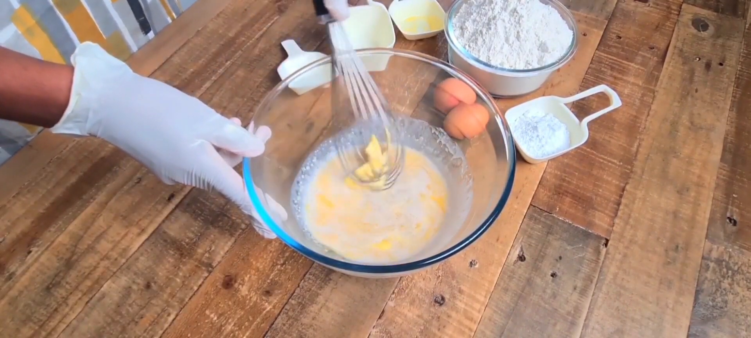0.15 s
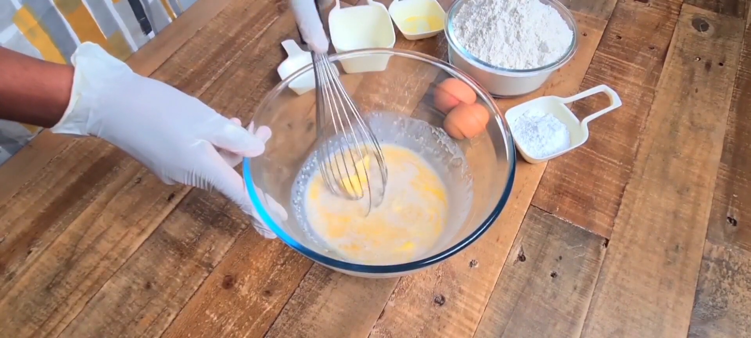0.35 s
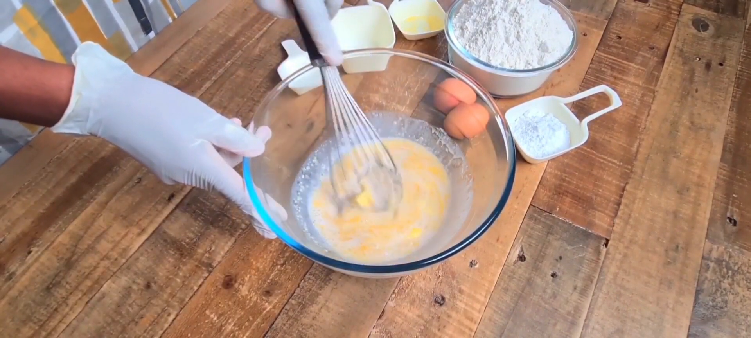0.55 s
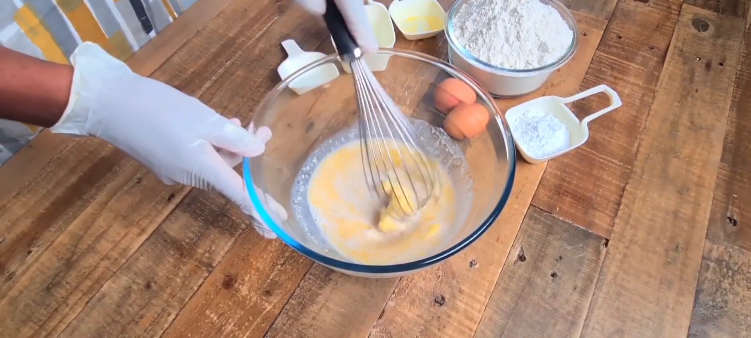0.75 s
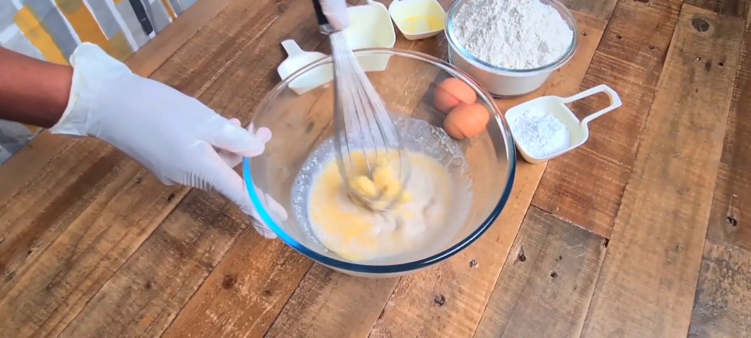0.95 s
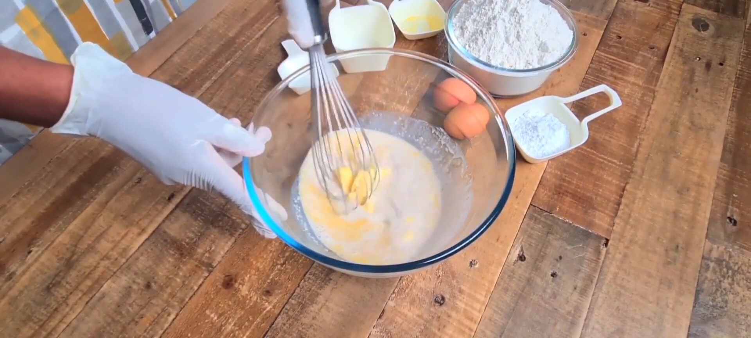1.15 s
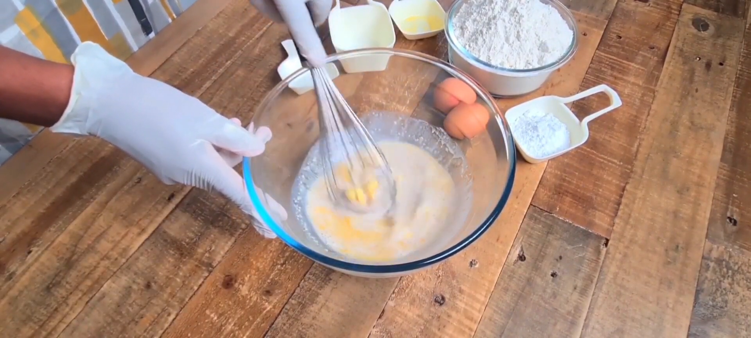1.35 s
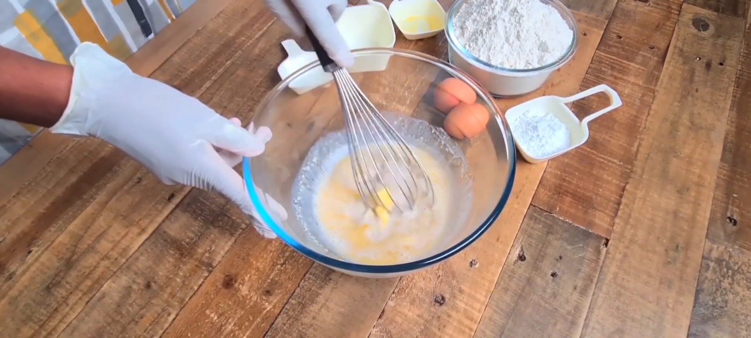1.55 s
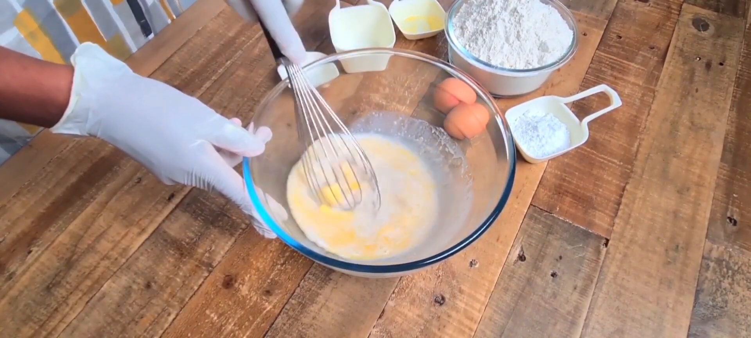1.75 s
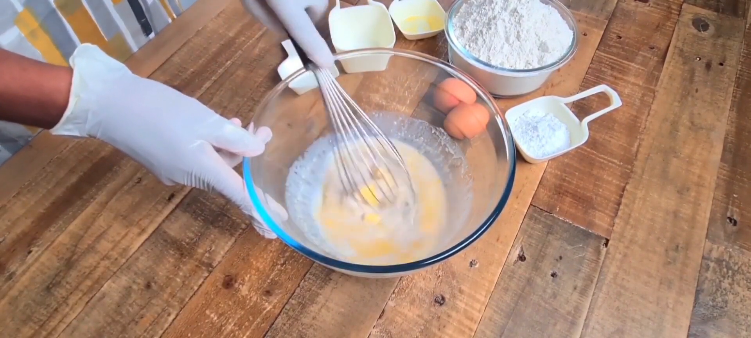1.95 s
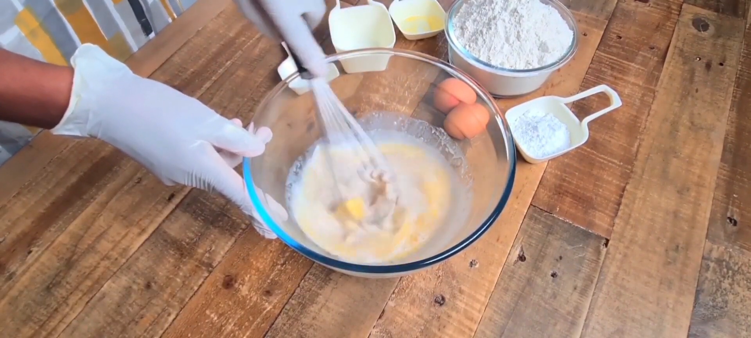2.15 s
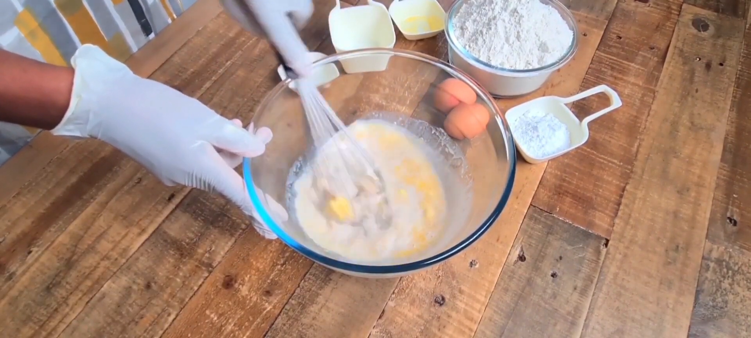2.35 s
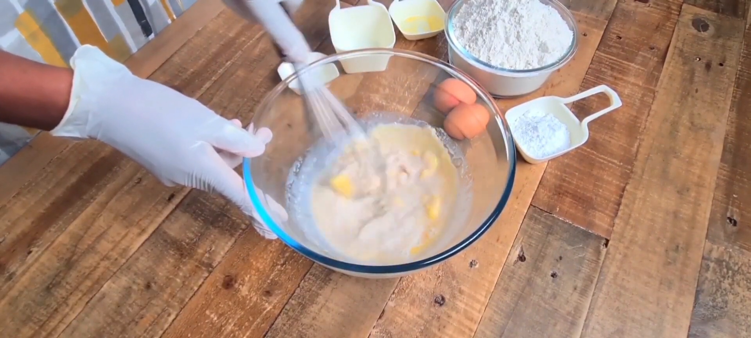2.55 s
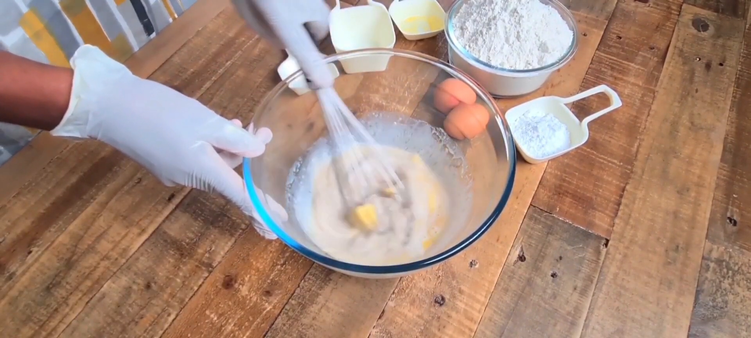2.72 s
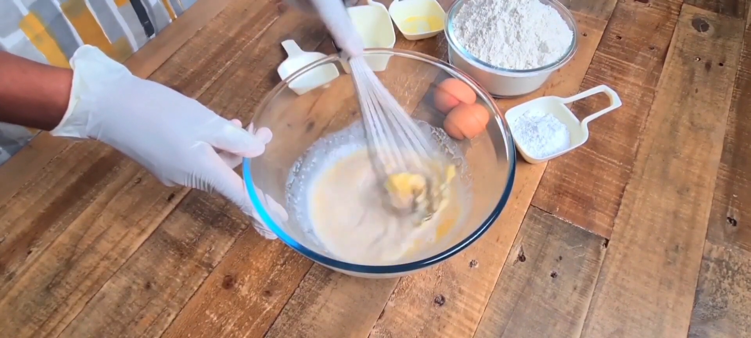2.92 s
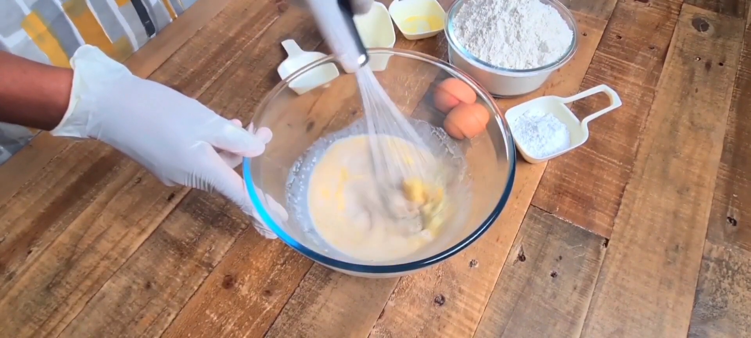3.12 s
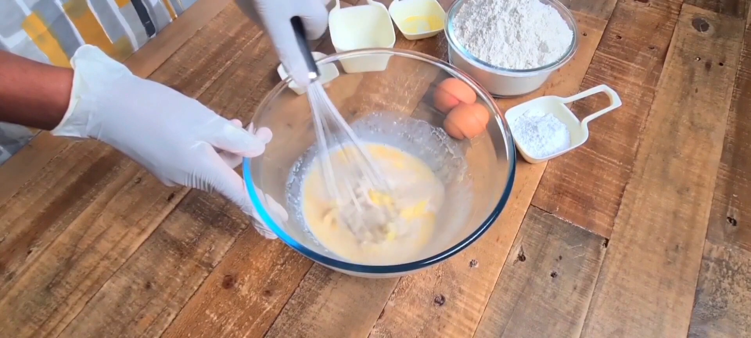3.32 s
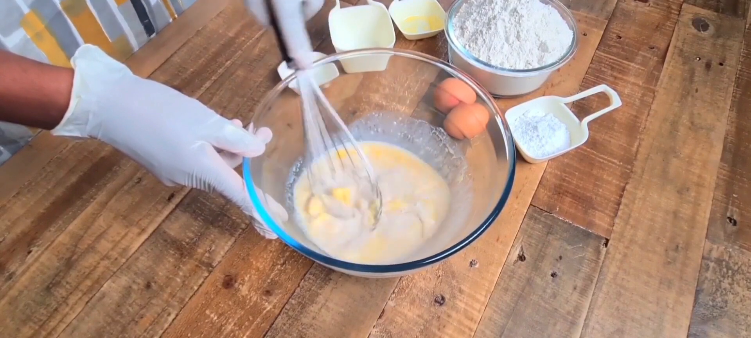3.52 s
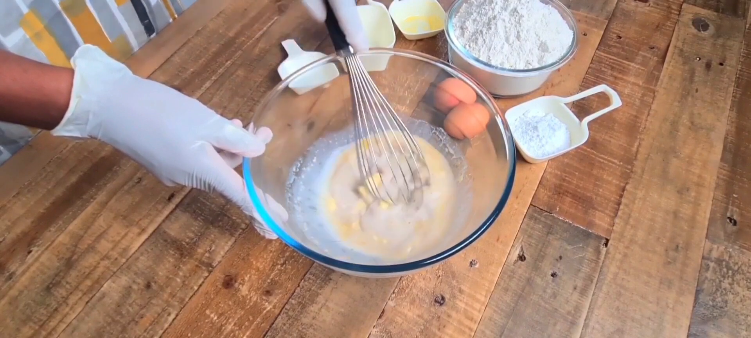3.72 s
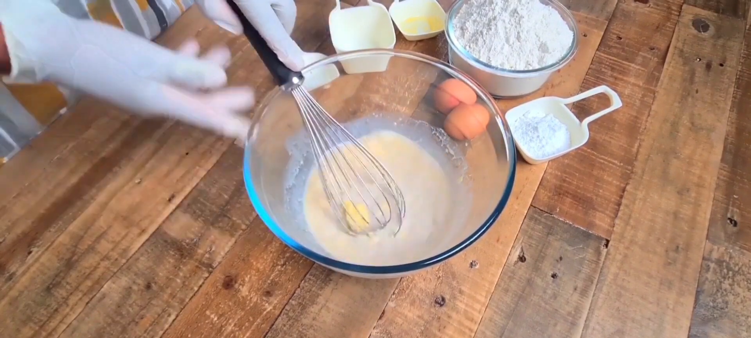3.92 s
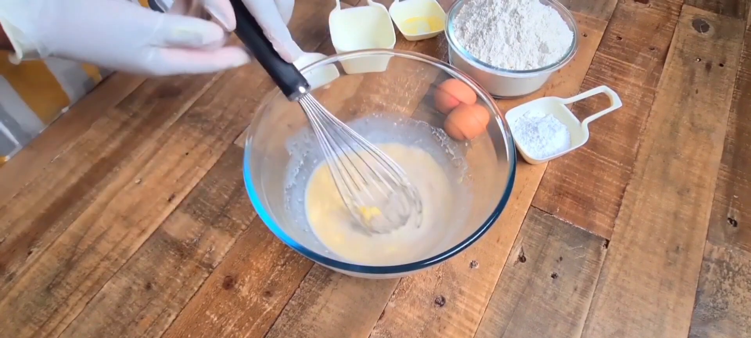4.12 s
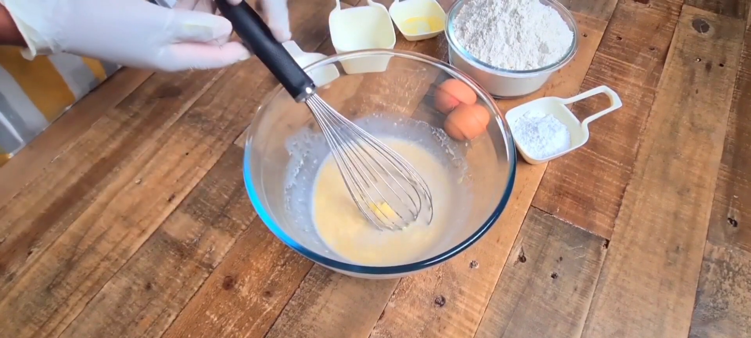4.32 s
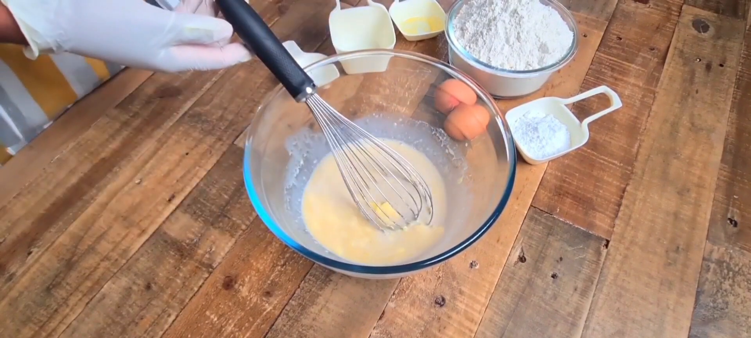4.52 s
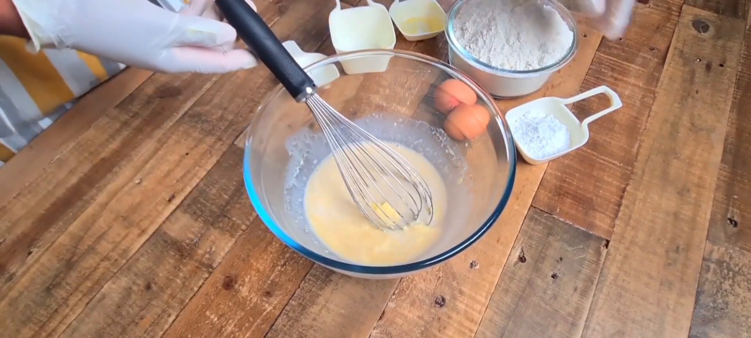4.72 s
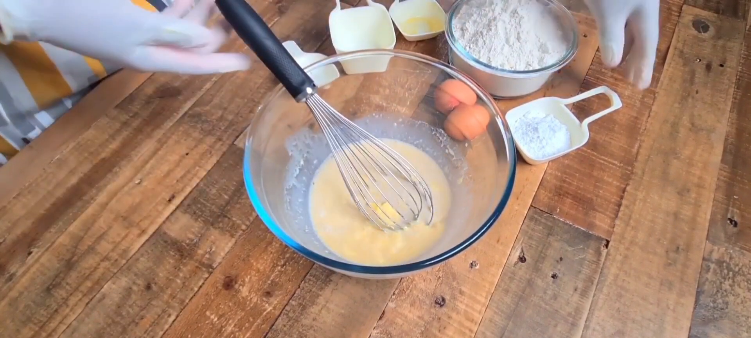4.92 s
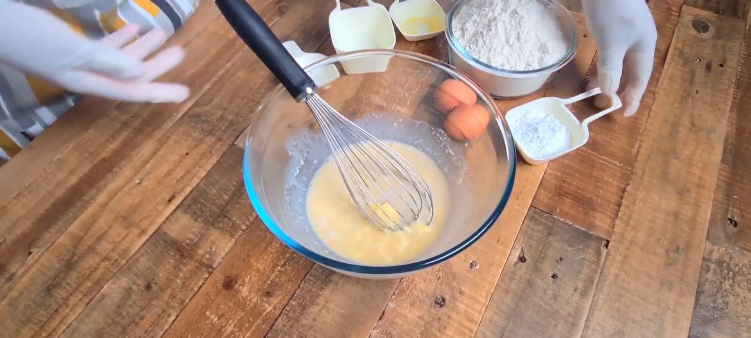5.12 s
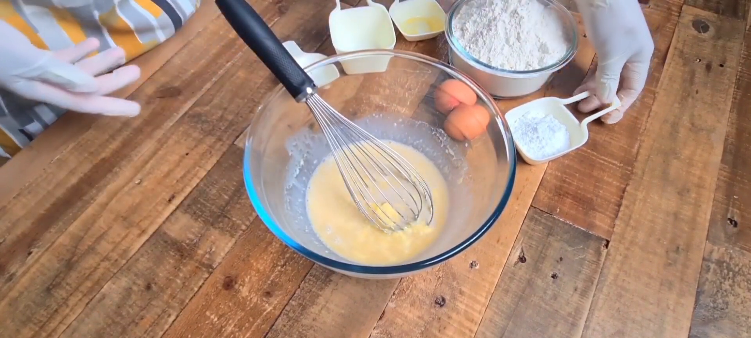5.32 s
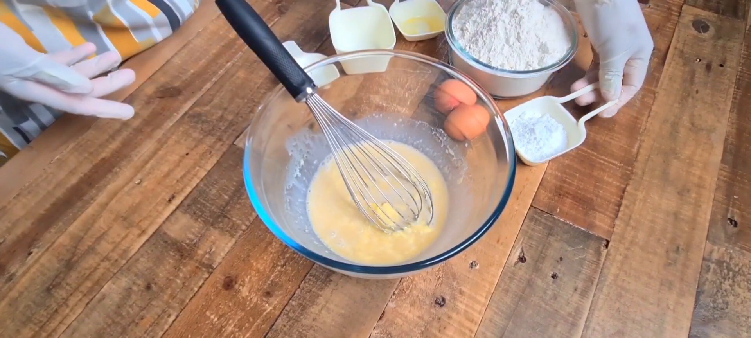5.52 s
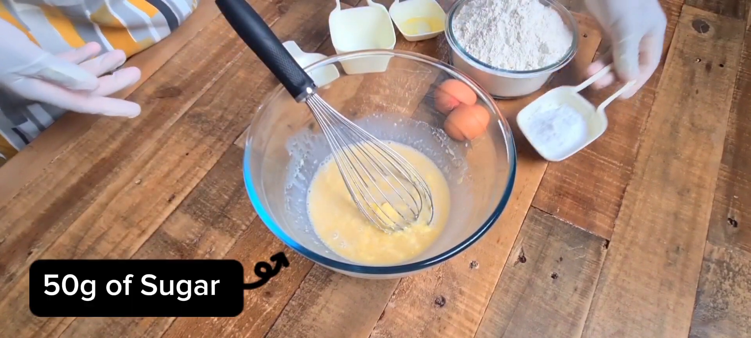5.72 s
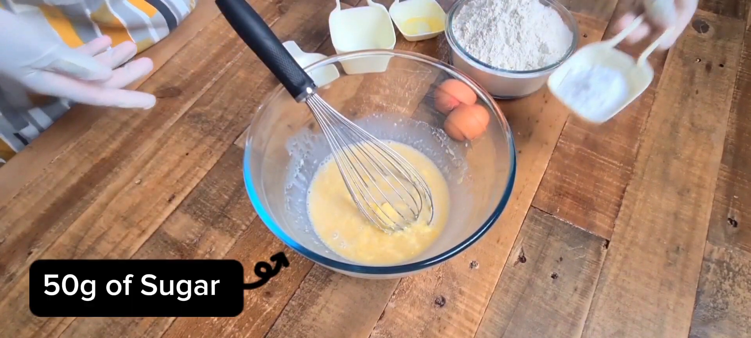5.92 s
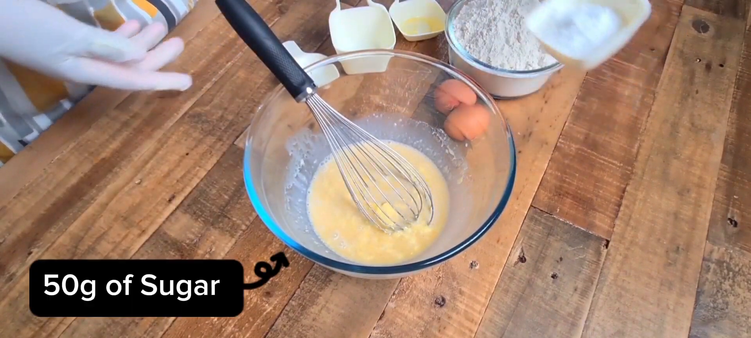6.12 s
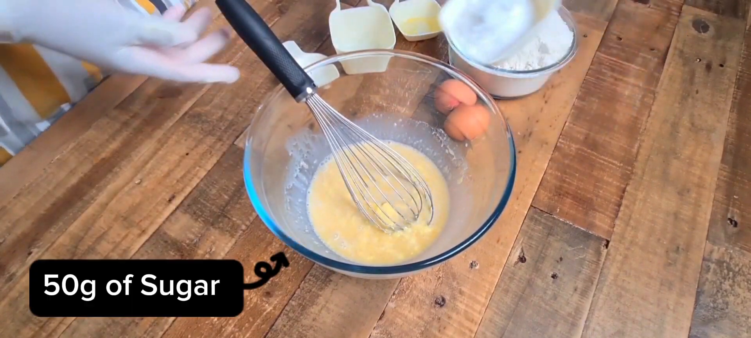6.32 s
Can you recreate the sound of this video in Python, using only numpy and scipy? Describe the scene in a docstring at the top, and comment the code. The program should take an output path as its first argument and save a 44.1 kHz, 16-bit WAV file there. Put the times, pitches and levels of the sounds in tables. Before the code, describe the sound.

A close stereo pickup in a small kitchen, with quiet room air and a faint low drone throughout. From 0 to 1 s a whisk stirs liquid gently in a glass bowl, with soft churning, tiny pops and a light wire brush near 0.4 s. From 1.2 s wire scratches tap the glass more clearly over low table bumps. Between 2 and 3 s the stirring is briskest: wet foamy swishes, gurgling bubbles, hollow plops and a sharp pop at 2.6 s. It eases around 3.1 s, then wires rattle again and two rapid knocks at 3.5 and 3.6 s ring the bowl. At 4.0 s the whisk drops against the rim with the strongest clack and a short bright glass ring; stirring stops. Dull wooden thuds cluster at 4.3 to 4.5 s. Faint rustling follows, then a plastic scoop scuffs the wood weakly at 5.5 s and harder at 5.7 s, fading out.

```python
"""A wire whisk stirs eggs and milk in a glass bowl on a wooden kitchen table: crackling wires brush the glass,
coloured crackle and swarms of bubbles make the swish, and single damped sines plop and pop.
The whisk knocks the bowl twice and is dropped against the rim: noise clacks, decaying glass modes ring.
The table thuds in low modes, then a plastic scoop sticks and slips over the wood in two short pushes.
Soft noise rustles, steady air and a faint drone lie behind; reflections place the sources in the kitchen."""
import sys
import numpy as np
from scipy import signal
from scipy.fft import rfft, irfft, next_fast_len
from scipy.io import wavfile
from scipy.ndimage import uniform_filter1d

SR = 44100
rng = np.random.default_rng(int(sys.argv[2]) if len(sys.argv) > 2 else 0)


def master(y):
    """Save y as 16-bit WAV."""
    cut = np.clip(np.atleast_2d(y).T, -1, 1)
    pcm = np.round(cut * 32767)  # scale
    wavfile.write(sys.argv[1], SR, pcm.astype(np.int16))


N = 285327  # length in samples

# wires brushing the glass: [t/s, level/dB, attack time constant/s: short for a tap, longer for a sweep]
WIRE_BRUSHES = [(0.4273, -52, 0.00062), (1.197, -38.5, 0.001), (1.464, -45, 0.0037), (1.539, -51, .001),
                (1.819, -44.5, 0.0013), (2.0099, -42, .0004), (2.164, -51.5, 0.00027),
                (2.644, -40, 0.00035), (3.2122, -44, 0.00023), (3.256, -42.5, 0.0017),
                (3.3554, -46, 0.00036), (3.6124, -34, 0.00075), (3.681, -34.5, .008),
                (4.238, -57.5, 0.0022)]
# hard knocks on the bowl: [t/s, ring level/dB, clack level/dB, clack t60/s, ring length/share of the free ring]
BOWL_KNOCKS = [(3.5421, -39, -33, 0.088, 1.16), (3.612, -37, -48.5, 0.45, 1.04),
               (4.0002, -29.5, -30.5, 0.059, 1.34)]
# scratch of the wires: [f/Hz, level/dB]
WIRE_SPECTRUM = [(1200, -50), (2300, -19), (3100, 4.5), (3900, 2.5), (4400, -1), (5500, -1.5), (6700, -0.5),
                 (8500, -8), (11500, -10), (16000, -11.5)]
# churned batter, also the noise of a table bump: [f/Hz, level/dB]
CHURN_SPECTRUM = [(25, -2.5), (55, 0.5), (160, 2.5), (330, 7), (430, -3.5), (570, 4.5), (780, -35),
                  (1300, -19), (2500, -79)]
# wet swish, also the snap of a bursting film: [f/Hz, level/dB]
SWISH_SPECTRUM = [(1200, -34), (2200, -12), (3200, 9.5), (4500, 8), (6900, 9), (8400, -14), (12000, -2.5),
                  (16000, -11)]
# hand-damped bowl wall: [f/Hz, width/Hz, level/dB]
WALL_PEAKS = [(760, 380, -5), (1234, 20.5, 8.5), (1736, 205, -7)]
SIDES = np.array([[.5], [-.5]])  # shares of a pan or lag at the two microphones


def amp(db):
    """Decibels to gain."""
    return 10 ** (np.asarray(db) / 20)


def unit(x):
    """Scale to rms 1."""
    return x / np.sqrt(np.mean(x ** 2) + 1e-20)


def fade(t, t60):
    """A decay that loses 60 dB in t60 seconds."""
    return np.exp(-np.log(1000) * t / t60)


def swell(t, attack):
    """A soft onset with a time constant in seconds."""
    return 1 - np.exp(-t / attack)


def seconds(n):
    """The times of n samples."""
    return np.arange(n) / SR


def along(points, hz):
    """Read (frequency, value) points on a log frequency axis."""
    f, v = np.transpose(points)
    return np.interp(np.log(hz + 1), np.log(f + 1), v)


def add(track, s, sound):
    """Mix a sound into a track at time s."""
    start = max(round(s * SR), 0)
    part = sound[..., :N - start]
    track[..., start:start + part.shape[-1]] += part


def filtered(x, response):
    """Multiply the spectrum of x by a response of frequency."""
    n = x.shape[-1]
    m = next_fast_len(n + SR // 8)
    return irfft(rfft(x, m) * response(np.fft.rfftfreq(m, 1 / SR)), m)[..., :n]


def colour(x, spectrum):
    """Shape x by a spectrum, at rms 1."""
    return unit(filtered(x, lambda hz: amp(along(spectrum, hz))))


def dull(x, edge_hz):
    """Roll off the treble of x above the edge."""
    return filtered(x, lambda hz: 1 / np.sqrt(1 + (hz / edge_hz) ** 8))


def resonate(x, peaks):
    """Pass x through a body's resonances, summed with alternating sign, at rms 1."""
    def response(f):
        total = 0
        for k, (centre, width, db) in enumerate(peaks):
            band = 1j * f * width
            total = total + (-1) ** k * amp(db) * band / (centre * centre - f * f + band)
        return total
    return unit(filtered(x, response))


def diffuse(pair):
    """Turn two unrelated signals into stereo: nearly one in the bass, apart in the treble."""
    # left-right likeness of diffuse sound: [f/Hz, correlation]
    likeness = [(100, 0.85), (300, 0.77), (700, 0.38), (1500, 0.039), (8000, 0.034)]
    turn = lambda hz: np.arccos(np.clip(along(likeness, hz), -1, 1)) / 2
    mid, side = filtered(pair, lambda hz: np.array([np.cos(turn(hz)), np.sin(turn(hz))]))
    return np.array([mid + side, mid - side])


def crackle(n, rate):
    """Random tiny impacts of uneven size, rate a second on average, at rms 1."""
    return unit((rng.random(n) < rate / SR) * rng.standard_normal(n))


def bubble(t, hz, t60, rise, attack):
    """A bubble's damped ring; its pitch climbs by rise octaves as it nears the surface."""
    pitch = hz * 2 ** (rise * np.minimum(t / t60, 1))
    return np.sin(2 * np.pi * np.cumsum(pitch, axis=-1) / SR) * fade(t, t60) * swell(t, attack)


def bubbles(hz, octaves, cycles, rise, range_db, count):
    """A swarm of bubbles of random time, size and loudness; each dies over a number of cycles, at rms 1."""
    when = rng.random(count)
    size = rng.standard_normal((count, 1))
    loud = rng.random((count, 1))
    pitch = np.minimum(hz * 2 ** (octaves * size), SR / 3)
    k = np.arange(SR // 25)
    rings = amp(range_db * loud) * bubble(k / SR, pitch, cycles / pitch, rise, attack=0.00019)
    places = (when * N).astype(int)[:, None] + k
    return unit(np.bincount(places.ravel(), rings.ravel(), N)[:N])


def stir_gains(rows):
    """One gain curve per level column, silent outside the rows; slower strokes are pushed further down."""
    brisk_db, growth = -52, 1.4  # level of brisk stirring; how much faster levels below it fall away
    s, *cols = np.transpose(rows)
    curves = []
    for col in cols:
        level = brisk_db + growth * (col - brisk_db)
        curves.append(amp(np.interp(seconds(N), s, level, left=-np.inf, right=-np.inf)))
    return curves


def wires(scratch_db=0, loop_db=-4, wall_db=-10, chatter_db=-6):
    """The loops hit the glass one after another in a fading rattle, which rings them and knocks the bowl's wall."""
    # ring of the wire loops: [f/Hz, width/Hz, level/dB]
    loop_peaks = [(2670, 120, -12.5), (3330, 31, 2), (3570, 91, -12), (3980, 21, -41), (4850, 140, -23),
                  (6000, 170, -15), (6500, 24, -8), (6760, 19, 6)]
    out, t = np.zeros(N), seconds(SR // 3)
    # each brush is a quick rattle and a softer, longer scrape
    decay = fade(t, t60=0.033) + amp(-13.5) * fade(t, t60=0.29)
    for s, db, attack in WIRE_BRUSHES:
        contacts = crackle(len(t), rate=5400)
        scratch = amp(scratch_db) * colour(contacts, WIRE_SPECTRUM)
        loops = amp(loop_db) * resonate(contacts, loop_peaks)
        knock = amp(wall_db) * resonate(contacts, WALL_PEAKS)
        add(out, s, amp(db) * (scratch + loops + knock) * decay * swell(t, attack))

    # a hard knock sets the loops chattering on the wall
    shake_db = -22.5  # relative to the ring level
    for s, ring_db, *_ in BOWL_KNOCKS:
        contacts = crackle(len(t), rate=3000)
        chatter = resonate(contacts, WALL_PEAKS) + amp(chatter_db) * colour(contacts, WIRE_SPECTRUM)
        add(out, s, amp(ring_db + shake_db) * chatter * fade(t, t60=0.25) * swell(t, attack=0.017))
    return out


def liquid(churn_db=2, gurgle_db=3, fizz_db=-2, swish_db=-1, tick_db=-5, slosh_db=4.0):
    """The stroke churns the batter, folds in air and tears the foam in uneven sloshes; wires tick as they cross."""
    # stirring strength, before stir_gains: [t/s, churn level/dB, wet swish level/dB]
    strokes = [(0.0, -74, -83), (0.41, -68.5, -71.5), (0.66, -60.5, -71.5), (0.8, -65, -76),
               (1.01, -79, -77.5), (1.28, -66, -73), (1.45, -63, -71), (2.04, -60.5, -65.5),
               (2.21, -60.5, -61), (2.73, -60.5, -58.5), (2.81, -59.5, -61), (2.99, -70, -64),
               (3.24, -73, -78), (3.41, -66.5, -62), (3.6, -60, -70), (3.71, -58, -64),
               (3.94, -63.5, -60.5), (4.0, -62, -66.5)]
    # air folded in by the fastest strokes, before stir_gains: [t/s, level/dB]
    folded_air = [(2.1, -77), (2.266, -63), (2.388, -61), (2.492, -61.5), (3.0, -78)]
    churn, swish = stir_gains(strokes)
    gurgle, = stir_gains(folded_air)
    range_db = 24  # loudness spread of the bubbles

    slosh = unit(amp(slosh_db * unit(uniform_filter1d(rng.standard_normal(N), size=900))))
    body = amp(churn_db) * churn * colour(crackle(N, rate=350), CHURN_SPECTRUM)
    air_swarm = bubbles(hz=1626, octaves=0.42, cycles=77, rise=0.72, range_db=range_db, count=2200)
    air = amp(gurgle_db) * gurgle * air_swarm
    foam_swarm = bubbles(hz=4350, octaves=0.455, cycles=24, rise=0.21, range_db=range_db, count=1600)
    fizz = amp(fizz_db) * foam_swarm
    film = amp(swish_db) * colour(crackle(N, rate=2200), SWISH_SPECTRUM)
    ticks = amp(tick_db) * colour(crackle(N, rate=120), WIRE_SPECTRUM)
    return body + air + swish * (slosh * (fizz + film) + ticks)


def plops(plop_db=4):
    """Single air pockets close behind the whisk and plop; the bigger, the lower and longer."""
    # closing air pockets: [t/s, level/dB before plop_db, f/Hz an eighth of the way through the decay]
    pockets = [(2.233, -41, 1597), (2.341, -48, 1060), (2.424, -36.5, 1355), (2.6087, -35.5, 1310),
               (2.869, -47.5, 2240), (3.3, -38, 824), (3.865, -37.5, 843)]
    cycles, rise = 58, .36  # cycles until a plop has died; octaves that its pitch climbs meanwhile
    out, t = np.zeros(N), seconds(SR // 6)
    for s, db, hz in pockets:
        start_hz = hz * 2 ** (-rise / 8)
        add(out, s, amp(db + plop_db) * bubble(t, start_hz, cycles / hz, rise, attack=0.00015))
    return out


def pops(pop_db=9, snap_db=-7):
    """Small bubbles ring briefly and burst with a noisy snap of their film."""
    # bursting bubbles: [t/s, level/dB before pop_db, starting f/Hz]
    bursts = [(.137, -52.5, 3220), (0.2313, -53.5, 5700), (1.1335, -40.5, 6180), (2.0123, -36, 3640),
              (2.1236, -39, 4420), (2.3537, -37, 6230), (2.4217, -35.5, 3960), (2.609, -26.5, 5080),
              (2.7394, -46, 3800), (2.812, -42.5, 6530), (2.8662, -36.5, 3630), (3.239, -35, 6070),
              (3.53, -39.5, 3860)]
    cycles = 46  # cycles until a pop has died
    out, t = np.zeros(N), seconds(SR // 16)
    for s, db, hz in bursts:
        snap = amp(snap_db) * colour(rng.standard_normal(len(t)), SWISH_SPECTRUM) * fade(t, t60=0.0031)
        ring = bubble(t, hz, cycles / hz, rise=0.52, attack=0.00019)
        add(out, s, amp(db + pop_db) * (ring + snap))
    return out


def clacks():
    """A hard knock on the bowl starts with a dry clack of decaying noise."""
    # clack of the struck bowl: [f/Hz, level/dB]
    clack_spectrum = [(120, -20), (330, 3), (580, -3.5), (720, -4.5), (1000, 0), (1300, -3), (1950, -11.5),
                      (3600, -16), (5600, -27), (6600, -13), (9000, -77), (16000, -58)]
    out, t = np.zeros(N), seconds(SR // 3)
    for s, _, db, t60, _ in BOWL_KNOCKS:
        add(out, s, amp(db) * colour(rng.standard_normal(len(t)), clack_spectrum) * fade(t, t60))
    return out


def ringing(pan_db=-2, apart=.13, answer_db=-5, blur_hz=35):
    """The glass modes ring on, scaled in length by each knock; the room answers with a blurred copy of them."""
    # free ring of the glass bowl: [f/Hz, level/dB, t60/s]
    glass_modes = [(934, -25, 0.69), (1647, -6.5, 0.46), (1719, -9.5, 0.4), (2550, -5, 0.35),
                   (3643, -4.5, 0.33), (4060, -21.5, 0.11), (4900, -12, 0.29), (6500, -14.5, 0.12),
                   (7180, -17.5, 0.065), (7060, -26.5, 0.51), (7900, -24, 0.15), (8560, -30.5, 0.18),
                   (9600, -34, 0.19), (11530, -24, 0.1), (13300, -34, 0.11)]
    blurred_modes = [(hz, blur_hz, db) for hz, db, _ in glass_modes]
    out, t = np.zeros((2, N)), seconds(SR * 3 // 4)
    for s, ring_db, _, _, free in BOWL_KNOCKS:
        for hz, db, t60 in glass_modes:
            # the wall's lobes reach the two microphones out of step (phase in cycles)
            phase = rng.random() + 2 * SIDES * apart * rng.choice([-1, 1])
            tone = np.sin(2 * np.pi * (hz * t + phase))
            add(out, s, amp(ring_db + db) * fade(t, t60 * free) * tone)
        blur = resonate(rng.standard_normal((2, len(t))), blurred_modes)
        add(out, s, amp(ring_db + answer_db) * blur * fade(t, t60=.38) * swell(t, attack=.012))
    return amp(pan_db * SIDES) * out


def table(thud_db=-4, upper_db=-4, bump_db=-8, edge_hz=45):
    """Every push, knock and brush on the bowl bumps the table top and sets its modes booming."""
    # bowl and hands pressing on the table: [t/s, level/dB before thud_db]
    presses = [(.422, -48), (.52, -45.5), (.688, -46), (1.205, -39), (1.396, -38.5), (1.521, -46.5),
               (3.265, -39.5), (4.334, -30), (4.375, -33), (4.463, -34), (4.508, -41.5)]
    # table top, before upper_db above 130 Hz: [f/Hz, level/dB, t60/s]
    board_modes = [(55.6, -13, 1), (81.43, 0, 0.64), (103, -3, 0.45), (142.5, -5, 0.32),
                   (177.1, -0.5, 0.33), (219, -19.5, 0.08), (291.8, -16.5, 0.72), (330.6, -12.5, 0.19),
                   (517, -14, 0.14)]
    out, t = np.zeros(N), seconds(SR * 3 // 4)
    boom = np.zeros(len(t))
    for hz, level, t60 in board_modes:
        boom += amp(level + upper_db * (hz > 130)) * fade(t, t60) * np.sin(2 * np.pi * hz * t)

    knocks = [(s, -35) for s, *_ in BOWL_KNOCKS]
    brushes = [(s, db - 5.5) for s, db, _ in WIRE_BRUSHES]  # a little under the brush itself
    for s, db in list(presses) + knocks + brushes:
        noise = dull(colour(rng.standard_normal(len(t)), CHURN_SPECTRUM), edge_hz=240)
        bump = amp(bump_db) * noise * fade(t, t60=0.43)
        add(out, s, amp(db + thud_db) * (boom + bump) * swell(t, attack=0.0017))
    return filtered(out, lambda hz: (1j * hz / (edge_hz + 1j * hz)) ** 2)  # deep bass below about 45 Hz is rolled off


def scoop(slide_db=1, slip_hz=150, scatter=.22, grit=0.31):
    """The plastic scoop sticks and slips on the wood, ringing its cup; each push swells and dies away."""
    # pushes of the scoop: [t/s at the peak, level/dB before slide_db]
    slides = [(5.511, -52.5), (5.731, -41)]
    # resonances of the cup: [f/Hz, width/Hz, level/dB]
    cup_peaks = [(201, 12, -5), (274, 17, 2), (340, 37.6, 4), (456, 50.3, 5), (533, 79, 0), (852, 39, -4.5),
                 (1090, 59, -17), (1254, 17, -12), (1620, 470, -28), (3300, 510, -60)]
    rise_s, t60 = 0.035, 0.38
    wander = unit(uniform_filter1d(rng.standard_normal(N), size=300))
    slip_rate = slip_hz * np.exp(scatter * wander)
    slips = np.diff(np.floor(np.cumsum(slip_rate) / SR), prepend=0)  # one click per slip
    t = seconds(N)
    push = np.zeros(N)
    for s, db in slides:
        before, after = np.minimum(t - s, 0), np.maximum(t - s, 0)
        push += amp(db) * np.exp(-(before / rise_s) ** 2) * fade(after, t60)
    rub = resonate(unit(slips) + grit * rng.standard_normal(N), cup_peaks)
    return amp(slide_db) * push * dull(rub, edge_hz=4200)


def gloves(spread=0.34):
    """Soft bands of noise swell and fade as gloves and sleeves brush the table and each other."""
    # rustles: [t/s at the peak, level/dB, f/Hz, half length/s]
    rustles = [(4.342, -77, 4910, 0.12), (4.606, -69.5, 136, 0.19), (5.104, -79, 215, 0.8),
               (5.105, -78, 3900, 0.08), (5.353, -74, 6300, 0.028)]
    t, out = seconds(N), np.zeros(N)
    for s, db, hz, half in rustles:
        rub = dull(resonate(rng.standard_normal(N), [(hz, spread * hz, 0)]), 2 * hz)
        out += amp(db) * np.exp(-((t - s) / half) ** 2) * rub
    return out


def room_tone(air_db=-69, drone_db=-67):
    """Steady diffuse air noise with a faint low drone of resonant noise."""
    # room air: [f/Hz, level/dB]
    air_spectrum = [(25, -6), (100, 3.5), (190, 0.5), (400, -7.5), (850, -21.5), (1700, -13.5), (2250, -27),
                    (3300, -18), (5200, -29), (6900, -16.5), (8300, -35), (16000, -32)]
    # faint drone: [f/Hz, width/Hz, level/dB]
    drone_peaks = [(192, 29, -19), (276.2, 6.8, -1.5), (529, 35.4, -2.5)]
    noise = lambda: diffuse(rng.standard_normal((2, N)))
    air = amp(air_db) * colour(noise(), air_spectrum)
    drone = amp(drone_db) * dull(resonate(noise(), drone_peaks), edge_hz=3300)
    return air + drone


def placed(x, pan_db, lag_ms, wet_db, near_db):
    """The direct sound at two microphones, with quick reflections off the table and the kitchen's tail."""
    # decay of the kitchen: [f/Hz, t60/s]
    kitchen_decay = [(150, 0.56), (1000, 0.34), (4000, 0.21), (14000, 0.11)]
    hz, t, z = signal.stft(rng.standard_normal((2, SR // 2)), SR, nperseg=256)
    tail = signal.istft(z * fade(t, along(kitchen_decay, hz)[:, None]), SR, nperseg=256)[1]
    near = rng.standard_normal(tail.shape) * fade(seconds(tail.shape[1]), t60=0.014)
    far_part = amp(wet_db) * tail / np.linalg.norm(tail[0])
    near_part = amp(near_db) * near / np.linalg.norm(near[0])
    echo = diffuse(far_part + near_part)

    lag = lambda f: np.exp(-2j * np.pi * f * SIDES * lag_ms / 1000)
    direct = filtered(x, lambda f: amp(pan_db * SIDES) * lag(f))
    late = np.pad(x, (SR // 1000, 0))[None]  # reflections start 1 ms later
    return direct + signal.fftconvolve(late, echo, axes=1)[:, :N]


def scene():
    """Everything on the table, heard in the kitchen; the table's boom reaches both microphones alike."""
    whisk = placed(wires() + gloves(), pan_db=-1, lag_ms=-.15, wet_db=-3, near_db=-1)
    batter = placed(liquid(), pan_db=-2.5, lag_ms=-.11, wet_db=-2.5, near_db=1)
    drops = placed(plops() + pops(), pan_db=-1.5, lag_ms=-.11, wet_db=-8, near_db=-11)
    glass = placed(clacks(), pan_db=-3, lag_ms=-0.12, wet_db=-1, near_db=3.0) + ringing()
    plastic = placed(scoop(), pan_db=-2.0, lag_ms=0.024, wet_db=-8.0, near_db=0)
    return whisk + batter + drops + glass + table() + plastic + room_tone()


def record(dry):
    """Nothing is kept above the band limit of 16.2 kHz."""
    return filtered(dry, lambda hz: hz < 16200)


dry = scene()
out = record(dry)
master(out)
```